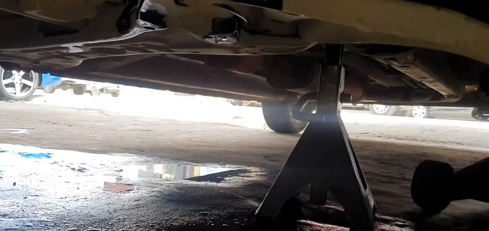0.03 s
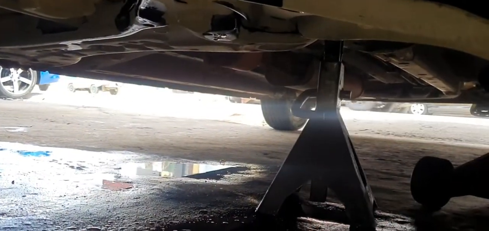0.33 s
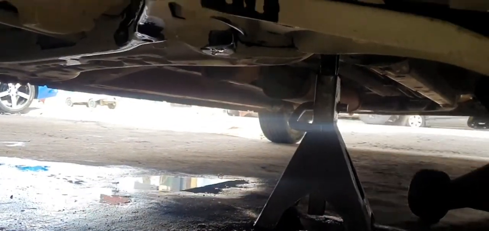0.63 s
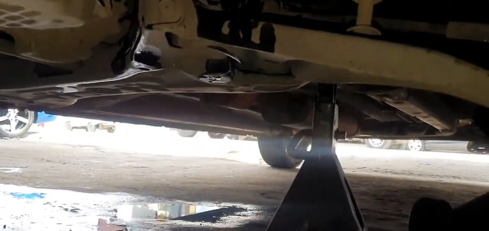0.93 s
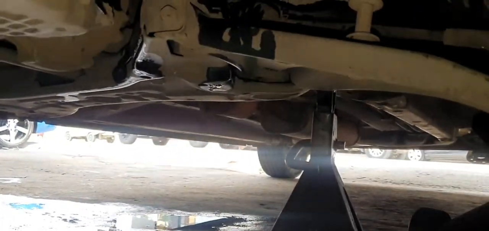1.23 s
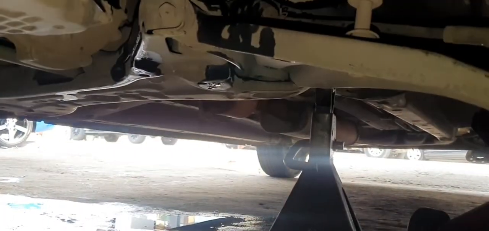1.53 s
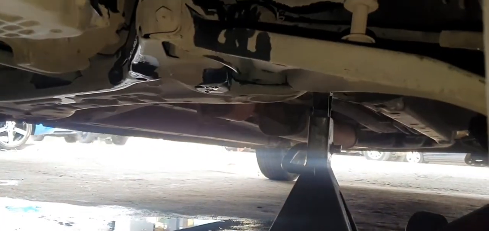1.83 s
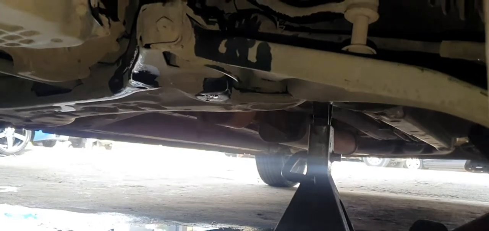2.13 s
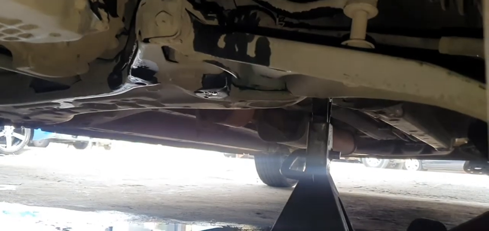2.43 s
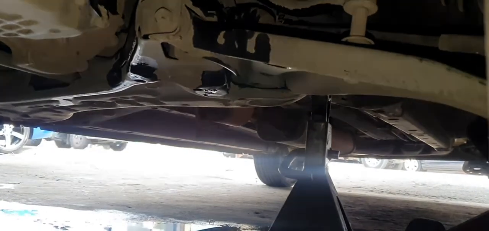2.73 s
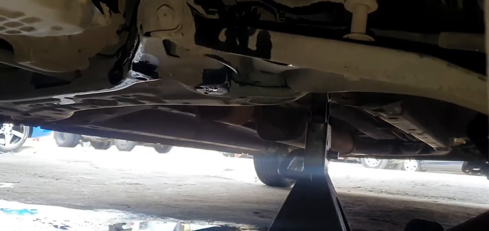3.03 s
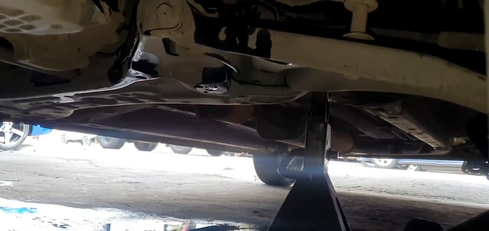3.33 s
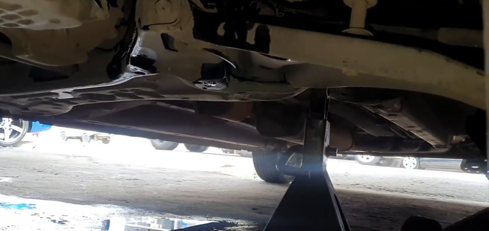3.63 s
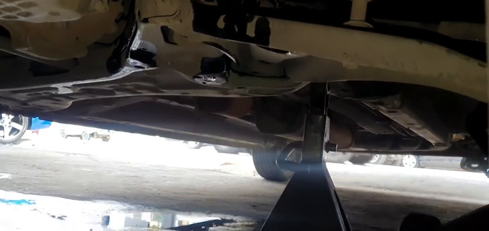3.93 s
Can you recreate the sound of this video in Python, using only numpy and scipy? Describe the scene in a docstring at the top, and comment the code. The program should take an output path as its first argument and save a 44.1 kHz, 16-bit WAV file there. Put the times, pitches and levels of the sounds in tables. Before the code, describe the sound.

Heard from beneath a raised car, a metal tool knocks in a quick flurry, then in three brief bursts, sometimes thudding in the frame. A nearby engine gradually picks up over street rumble, with a faint whistle late.

```python
"""Outdoor rumble and the hum of a nearby engine, its firing tone slowly gaining speed and level.
The microphone is under a car raised on a stand. Something soft, probably clothing, brushes past it.
Close by on the right a steel tool clacks and ticks in short clusters: each blow rings the steel and
echoes between floor pan and concrete, and some also thud in the car's hollow frame.
Late on, as the engine pulls, a rough whistle swells and fades."""
import sys
import numpy as np
from scipy import signal
from scipy.fft import rfft, irfft, next_fast_len
from scipy.io import wavfile
from scipy.ndimage import map_coordinates

SR = 44100
rng = np.random.default_rng(int(sys.argv[2]) if len(sys.argv) > 2 else 0)


def master(y):
    """Save y as 16-bit WAV."""
    cut = np.clip(np.atleast_2d(y).T, -1, 1)
    pcm = np.round(cut * 32767)  # scale
    wavfile.write(sys.argv[1], SR, pcm.astype(np.int16))


N = 4 * SR


def amp(db):
    """Decibels to gain."""
    return 10 ** (np.asarray(db) / 20)


def unit(x):
    """Scale to rms 1."""
    return x / np.sqrt(np.mean(x ** 2) + 1e-20)


def along(points, hz):
    """Read (f/Hz, value) points on a log frequency axis."""
    freqs, values = np.transpose(points)
    return np.interp(np.log(hz + 1), np.log(freqs + 1), values)


def curves(rows):
    """One value per sample for each column after the time."""
    times, *columns = np.transpose(rows)
    return [np.interp(np.arange(N) / SR, times, column) for column in columns]


def wobble(rate):
    """A smooth random curve, rate knots a second."""
    return map_coordinates(rng.standard_normal(400), [np.arange(N) * rate / SR], mode="wrap")


def pan(db):
    """Channel gains for a left-minus-right level: negative lies to the right of the microphone."""
    return amp(np.array([[db], [-db]]) / 2)


def add(out, start, x):
    """Mix x into out from start seconds on."""
    part = out[:, round(start * SR):][:, :x.shape[1]]
    part += x[:, :part.shape[1]]


# How alike the two sides of the microphone are: f/Hz, correlation (-1 to 1)
STEREO_LIKENESS = [(60, 0.96), (180, 0.94), (350, 0.69), (700, 0.14), (1400, -0.22), (2800, 0.024),
                   (5500, -0.087), (12000, -0.037)]

def noise(spectrum, size=N):
    """Coloured stereo noise of rms 1: alike in the bass, unrelated in the treble."""
    hz = np.fft.rfftfreq(size, 1 / SR)
    angle = np.arccos(np.clip(along(STEREO_LIKENESS, hz), -1, 1)) / 2
    coloured = rfft(rng.standard_normal((2, size))) * amp(along(spectrum, hz))
    mid, side = irfft(coloured * [np.cos(angle), np.sin(angle)], size)
    return unit(np.array([mid + side, mid - side]))


def band(hz, width_hz):
    """Narrow noise around one pitch, 12 dB down at width_hz to either side."""
    skirt = [(-4, -50), (-1, -12), (0, 0), (1, -12), (4, -50), (9, -90)]
    return noise([(hz + widths * width_hz, db) for widths, db in skirt])


# The street beyond the car: t/s, rumble level/dB, wash level/dB
STREET_LEVELS = [(0, -32, -40.5), (.3, -30.5, -40.5), (.55, -25, -35.5), (.92, -22, -36.5),
                 (1.5, -26.5, -36), (2.25, -27.5, -34), (2.55, -23.5, -29.5), (2.75, -25.5, -31.5),
                 (3.4, -28, -30), (4, -26, -31)]
# Spectra of the rumble and the wash: f/Hz, relative level/dB
RUMBLE_SPECTRUM = [(20, -36), (32, -28), (50, -5.5), (80, 5.5), (105, -4.5), (145, 2.5), (190, -2.5),
                   (260, -10), (900, -74)]
WASH_SPECTRUM = [(150, -31), (500, 0), (780, -1), (980, -1.5), (1250, -1.5), (1650, -5.5), (1900, -5),
                 (3100, -10.5), (3700, -15), (5000, -17), (7000, -23), (9000, -30.5), (12000, -28),
                 (16000, -35.5)]

def street():
    """Open air all round: low rumble, a broad wash and a faint, thin high whine."""
    rumble_db, wash_db = curves(STREET_LEVELS)
    rumble = amp(rumble_db + 1.3 * wobble(10)) * noise(RUMBLE_SPECTRUM)
    wash = amp(wash_db + 0.068 * wobble(8.5)) * noise(WASH_SPECTRUM) * pan(-2)
    whine = amp(wash_db - 32.5 + 3.9 * wobble(7.32)) * band(hz=11300, width_hz=200)
    return rumble + wash + whine


# Spectrum of the background drone: f/Hz, relative level/dB
DRONE_SPECTRUM = [(100, -43), (220, -1.5), (335, 0.5), (410, -7.5), (700, -9.5), (3000, -57)]
# Its rise and fall: t/s, level/dB
DRONE_LEVELS = [(.55, -31.5), (.92, -29.5), (1.4, -28), (2.2, -33), (2.55, -28), (2.72, -32.5),
                (3.6, -26.5)]

def drone():
    """A hollow, wavering band of noise just above the rumble."""
    return amp(curves(DRONE_LEVELS)[0] + 0.83 * wobble(8.95)) * noise(DRONE_SPECTRUM)


# Firing rate of the nearby engine: t/s, f/Hz
FIRING_RATE = [(0, 40.47), (.8, 42.5), (2.2, 44.51), (3.2, 48.01), (3.5, 48.93), (4, 49.33)]
# Exhaust boom, the firing tone itself: t/s, level/dB
BOOM_LEVELS = [(0, -41), (.3, -40), (.8, -26.5), (1.05, -30), (1.43, -24), (1.6, -28), (1.88, -27),
               (2.0, -23), (2.4, -21.5), (2.86, -17.5), (3.13, -18.5), (3.36, -22), (3.47, -29),
               (3.66, -18.5), (4, -19)]
# Its overtones: multiple of the firing rate, idle level/dB, pulling level/dB
OVERTONES = [(2, -39, -35), (3, -42.5, -34), (4, -42.5, -36), (6, -49, -41), (7, -55, -40.5)]
PULL_S = (2.29, 2.76)  # the engine takes up load between these times

def engine():
    """Nearby, almost centre: a clean exhaust boom and wavering overtones that grow with load."""
    (firing_hz,), (boom_db,) = curves(FIRING_RATE), curves(BOOM_LEVELS)
    phase = 2 * np.pi * np.cumsum(firing_hz) / SR
    load = np.interp(np.arange(N) / SR, PULL_S, [0, 1])
    swing_db = 0.47 * (boom_db - boom_db.mean())  # overtones partly follow the boom
    hum = amp(boom_db) * np.sin(phase)
    for multiple, idle_db, pull_db in OVERTONES:
        db = idle_db + load * (pull_db - idle_db) + swing_db + 2 * wobble(5)
        hum += amp(db) * np.sin(multiple * phase + 2 * np.pi * rng.random() + 0.18 * wobble(3.38))
    return np.sqrt(2) * hum * pan(-1)


# Resonances of the same engine: f/Hz, width/Hz, relative level/dB
WHIR_BANDS = [(494, 32, 1.5), (660, 130, -5), (1174, 86, 2), (1348, 96, 1.5), (2115, 53, -9.5)]
# All of them together at the microphone: t/s, level/dB
WHIR_LEVELS = [(0, -53), (1.2, -41), (2.1, -38), (2.7, -35), (4, -39)]

def whir():
    """Mechanical noise of the engine in a few narrow resonances."""
    resonances = sum(amp(db) * band(hz, width) for hz, width, db in WHIR_BANDS)
    return amp(curves(WHIR_LEVELS)[0]) * unit(resonances)


# Strokes right at the microphone: t/s, length/s, level/dB
BRUSH_STROKES = [(0.099, .18, -42), (0.303, 0.13, -37), (0.515, .12, -36), (0.718, 0.089, -41),
                 (.85, 0.11, -41), (2.495, .12, -38.5)]
# Their hiss: f/Hz, relative level/dB
BRUSH_SPECTRUM = [(300, 7), (900, 9), (1450, 12), (2500, 3), (4500, 0), (7000, -1.5), (9000, -7.5),
                  (12000, -1.5), (16000, -7)]
BRUSH_RISE_S, BRUSH_FALL_S = 0.034, 0.051

def brushes():
    """Something soft rubs past in strokes of hiss that swell and then fade more slowly."""
    strokes, t = np.zeros(N), np.arange(N) / SR
    for start, length, db in BRUSH_STROKES:
        rise = (t - start) / BRUSH_RISE_S
        fall = (start + length - t) / BRUSH_FALL_S
        strokes += amp(db) * np.clip(np.minimum(rise, fall), 0, 1)
    return strokes * amp(0.8 * wobble(70)) * noise(BRUSH_SPECTRUM)


def fade(t, t60, attack_s=0.0013):
    """A struck envelope: a quick rise, then a fall of 60 dB in t60 seconds."""
    return (1 - np.exp(-t / attack_s)) * np.exp(-np.log(1000) * t / t60)


def early_echoes(x, delay_range_s=(0.00087, 0.011), echo_db=-15):
    """Eight short echoes between floor pan and concrete colour each channel differently."""
    response = np.zeros((2, SR // 20))
    response[:, 0] = 1
    for channel in response:
        delays = (rng.uniform(*delay_range_s, size=8) * SR).astype(int)
        channel[delays] += amp(echo_db) * rng.standard_normal(size=8)
    response /= np.linalg.norm(response, axis=1, keepdims=True)
    return signal.fftconvolve(x, response, axes=1)[:, :x.shape[1]]


def burst(spectrum, t, t60):
    """The noisy part of a contact, with a tail as the gap under the car keeps ringing."""
    tail = amp(-5) * fade(t, t60=0.27)
    return early_echoes(noise(spectrum, len(t)) * np.hypot(fade(t, t60), tail))


def ring(modes, t):
    """Damped modes reach the microphone directly and off the floor pan and the concrete."""
    direct = sum(amp(db) * fade(t, t60) * np.sin(2 * np.pi * (hz * t + rng.random((2, 1))))
                 for hz, db, t60 in modes)
    gap = rng.standard_normal((2, len(t))) * fade(t, t60=0.06)
    echo = signal.fftconvolve(direct, gap / np.linalg.norm(gap[0]), axes=1)[:, :len(t)]
    return np.sqrt(2) * (direct + amp(-8) * echo)


# The tool, close on the right: t/s, blow level/dB, clack f/Hz, clack level/dB, steel level/dB
TOOL_KNOCKS = [(.422, -30, 2300, -31, -32), (.523, -25, 2330, -20.5, -27.5), (.541, -26.5, 1820, -23, -24),
               (.556, -23, 1527, -13.5, -21), (.682, -33.5, 2500, -31, -40), (.812, -37, 2400, -29, -31),
               (.8368, -18, 2344, -14.5, -20.5), (1.7041, -20.5, 2180, -17, -38),
               (1.711, -30, 1200, -21.5, -42), (1.753, -22.5, 2267, -14.5, -27),
               (1.784, -33, 2260, -18, -41), (1.801, -30, 840, -19, -31), (2.372, -29, 2360, -23.5, -48),
               (2.4053, -18, 2350, -13, -32), (2.436, -22.5, 2440, -13.5, -36),
               (3.418, -19.5, 2320, -14, -40), (3.436, -24, 1760, -22, -36), (3.474, -27.5, 2380, -22, -28),
               (3.995, -21.5, 2278, -25, -52)]
# Noise of the blow: f/Hz, relative level/dB
BLOW_SPECTRUM = [(30, -30), (300, -2), (500, 1), (750, 0.5), (1200, 6), (1700, 1), (2400, 4), (3400, -4.5),
                 (4100, -3), (5200, -3.5), (6800, -9), (9000, -20.5), (12000, -22.5), (16000, -38)]
# Modes of the clack: ratio to its pitch, relative level/dB, t60/s
CLACK_MODES = [(1, -0.5, 0.03), (1.02, -15.5, 0.011), (0.765, -12, 0.023)]
# Modes of the steel: f/Hz, relative level/dB, t60/s
STEEL_MODES = [(550, -10.5, .22), (805, -12, 0.44), (1108, -10, 0.15), (1531, -2.5, .15), (1710, -14, 0.23),
               (3400, -10, 0.055)]
STEEL_PAN_DB = -2

def knocks():
    """Each knock of the tool is a noisy blow, a short pitched clack and a longer ring of steel."""
    out, t = np.zeros((2, N)), np.arange(SR // 2) / SR
    for start, blow_db, clack_hz, clack_db, steel_db in TOOL_KNOCKS:
        blow = amp(blow_db) * pan(-3.5) * burst(BLOW_SPECTRUM, t, t60=0.059)
        clack_modes = [(ratio * clack_hz, db, t60) for ratio, db, t60 in CLACK_MODES]
        clack = amp(clack_db) * pan(-8) * ring(clack_modes, t)
        steel = amp(steel_db) * pan(STEEL_PAN_DB) * ring(STEEL_MODES, t)
        add(out, start, blow + clack + steel)
    return out


# Blows that carry into the frame overhead: t/s, level/dB, t60/s
FRAME_THUDS = [(.422, -24, 0.19), (.548, -26, 0.48), (.84, -28, 0.8), (2.436, -23.5, 0.5)]
# The frame's response: f/Hz, relative level/dB
FRAME_SPECTRUM = [(20, -47), (300, -5.5), (430, 0.5), (560, -1), (3000, -48)]

def thuds():
    """The car's hollow frame answers some of the blows with a dull bump."""
    out, t = np.zeros((2, N)), np.arange(SR // 2) / SR
    for start, db, t60 in FRAME_THUDS:
        add(out, start, amp(db) * noise(FRAME_SPECTRUM, len(t)) * fade(t, t60))
    return out


# Light contacts close by: t/s, snap level/dB, ping f/Hz, ping level/dB, left minus right/dB
METAL_TICKS = [(.5535, -30.5, 6200, -31, -2), (.787, -31, 6820, -30.5, -4.5), (.838, -32, 5400, -25, -3),
               (1.706, -42, 5130, -28, 1), (1.711, -51, 3556, -26, 0), (1.823, -44, 6040, -44, -2),
               (2.3695, -28, 7730, -34, -3), (3.416, -35.5, 5640, -23, -6)]
# Noise of the snap: f/Hz, relative level/dB
SNAP_SPECTRUM = [(1000, -15), (4000, -3), (5800, 3.5), (7500, 2), (8800, 3.5), (10000, -4.5), (12000, 2),
                 (16000, -9)]

def ticks():
    """Metal touches metal: a bright snap with a rough, narrow ping."""
    out, t = np.zeros((2, N)), np.arange(SR // 2) / SR
    for start, snap_db, hz, ping_db, pan_db in METAL_TICKS:
        ping = amp(ping_db) * band(hz, width_hz=0.042 * hz)[:, :len(t)] * fade(t, t60=0.075)
        snap = amp(snap_db) * burst(SNAP_SPECTRUM, t, t60=0.073)
        add(out, start, pan(pan_db) * (snap + ping))
    return out


# Clusters of high modes in the steel, close by: f/Hz, width/Hz, relative level/dB, t60/s
SHIMMER_CLUSTERS = [(4660, 230, -2.5, 0.43), (4940, 160, 2, 0.11), (3340, 110, -1, 0.18),
                    (5970, 120, -11, .11)]

def shimmer(start_s=0.8375, level_db=-27):
    """After the hardest blow, close modes beat roughly against each other as they die away."""
    out, t = np.zeros((2, N)), np.arange(SR // 2) / SR
    for hz, width, db, t60 in SHIMMER_CLUSTERS:
        add(out, start_s, amp(level_db + db) * band(hz, width)[:, :len(t)] * fade(t, t60))
    return out * pan(STEEL_PAN_DB)


# The whistle over the nearby engine: t/s, level/dB
WHISTLE_LEVELS = [(1.4, -68), (2.9, -46), (3.05, -43), (3.32, -42.5), (4, -51)]

def whistle():
    """A rough whistle swells late in the engine's pull and fades again."""
    return amp(curves(WHISTLE_LEVELS)[0]) * band(hz=2786, width_hz=42)


def scene():
    """From under the car: the tool and the brushing close by, the engine and the street beyond."""
    close = knocks() + thuds() + ticks() + shimmer() + brushes()
    return close + engine() + whir() + whistle() + street() + drone()


def record(dry, top_hz=15950):
    """The recorder keeps nothing above its band limit."""
    margin = SR // 4
    padded = np.pad(dry, ((0, 0), (margin, margin)), mode="reflect")
    size = next_fast_len(padded.shape[1])
    passband = np.fft.rfftfreq(size, 1 / SR) < top_hz
    return irfft(rfft(padded, size) * passband, size)[:, margin:margin + N]


dry = scene()
out = record(dry)
master(out)
```